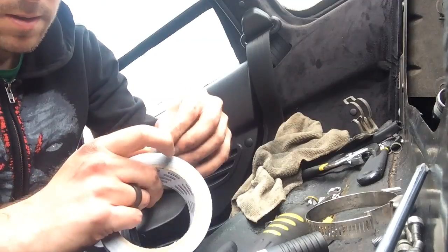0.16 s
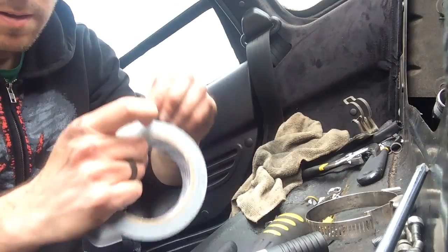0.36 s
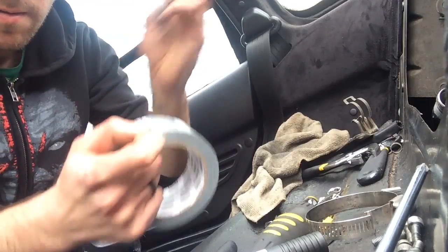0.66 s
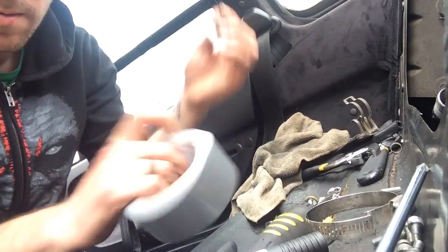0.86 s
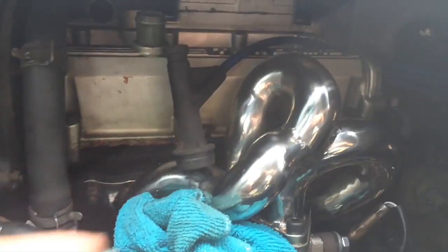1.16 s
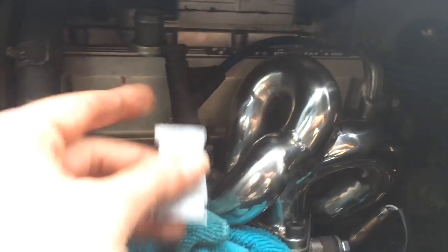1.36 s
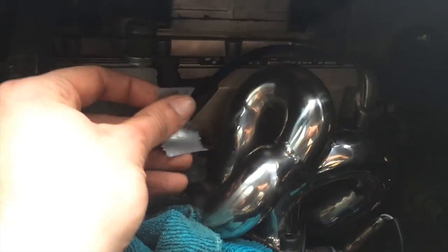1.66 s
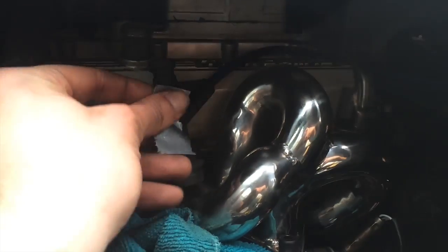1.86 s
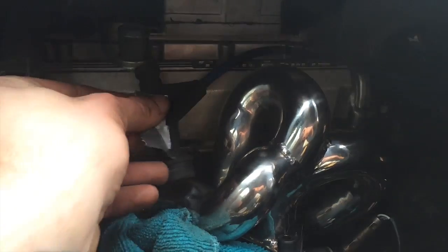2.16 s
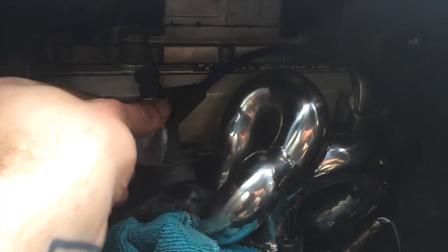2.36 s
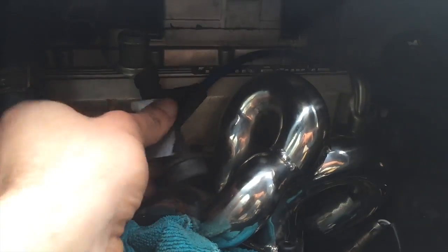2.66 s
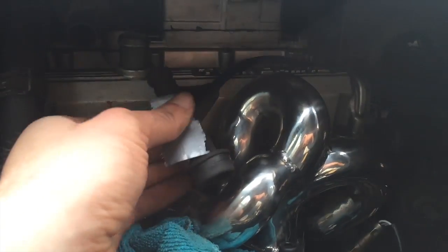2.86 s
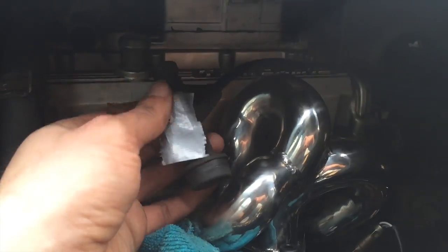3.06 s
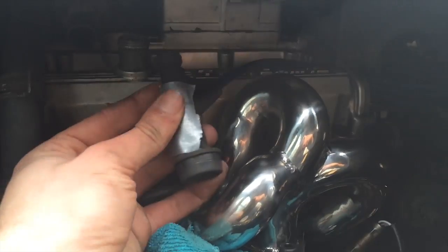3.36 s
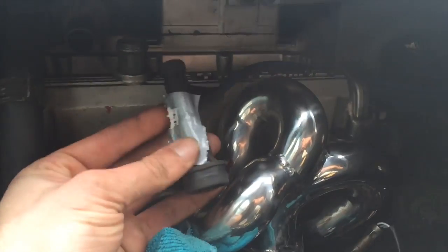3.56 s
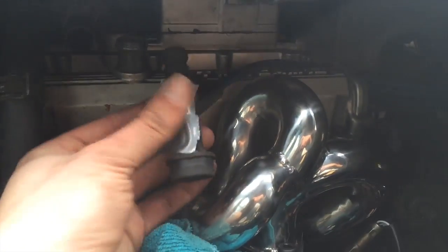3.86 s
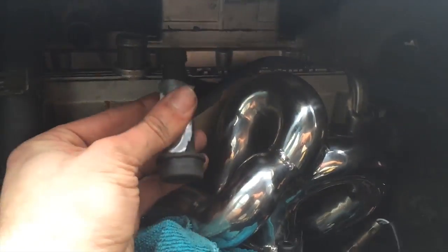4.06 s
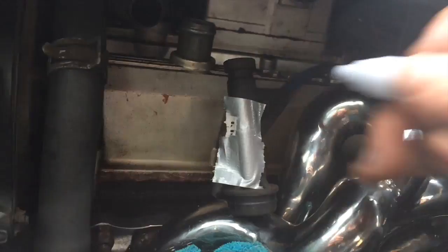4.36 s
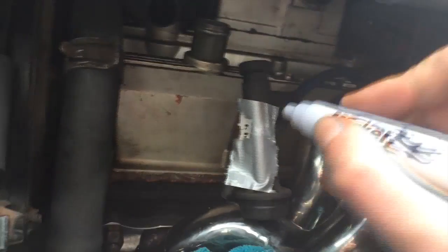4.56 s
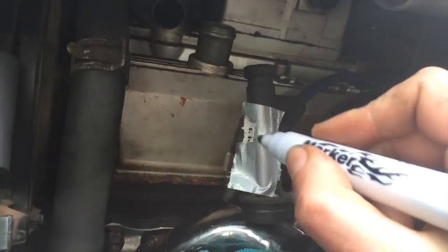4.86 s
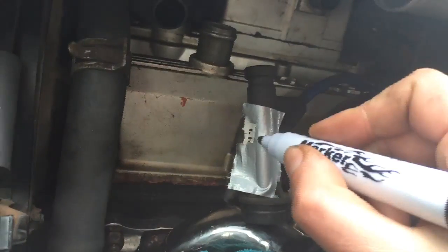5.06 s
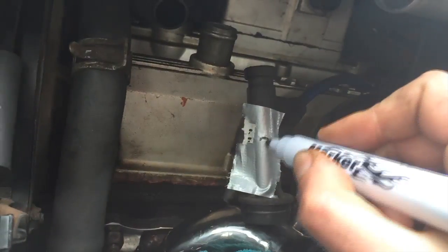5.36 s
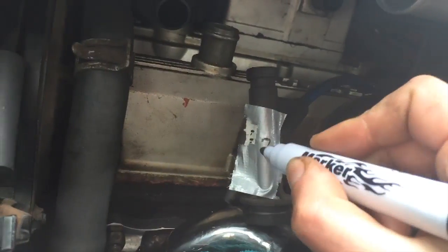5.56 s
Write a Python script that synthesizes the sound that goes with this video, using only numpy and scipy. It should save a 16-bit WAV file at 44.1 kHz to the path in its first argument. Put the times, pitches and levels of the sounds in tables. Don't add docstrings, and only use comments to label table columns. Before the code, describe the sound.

In a vehicle cabin a fingernail ticks at cloth tape, then a strip tears off in a bright, very loud crackling rip. The roll lands with a hollow thud and rattle. An abrupt cut leads to a drier engine bay: small sticky peeling snaps, a soft hose knock, faint skin and cloth rubbing and sparse ticks over low rumble and airy hiss. Close handheld microphone.

```python
import sys
import numpy as np
from scipy import signal
from scipy.fft import rfft, irfft
from scipy.io import wavfile
from scipy.ndimage import uniform_filter1d

SR = 44100
rng = np.random.default_rng(int(sys.argv[2]) if len(sys.argv) > 2 else 0)


def how_loud(loudness_db):
    steps = np.asarray(loudness_db, float) / 20
    return 10 ** steps


def store_pcm(level_fs):
    pcm = np.round(np.clip(level_fs, -1, 1) * 32767).astype(np.int16)
    wavfile.write(sys.argv[1], SR, np.atleast_2d(pcm).T)


N = 252156
CUT_S = 1.159

# [f/Hz, width/Hz]
TAPE_ZONES = [(1820, 1700), (4200, 2330), (7900, 3300), (12500, 3500)]
# [loss per zone away from the brightest/dB, (trim of each zone/dB)]
SNAP_TONES = [
    (7, (-1, 3, -3, 5)),
    (5.5, (-3.5, 1, -3.5, 0.5)),
    (4.6, (-5.5, -1, 2, 3.5)),
    (8.7, (0.82, -1.63, -0.31, 0.73)),
    (5.2, (0.3, -0.91, 0.71, -0.3)),
]
# [t/s, peak level/dB, brightness 0-3, extra body/dB]
RIP_RELEASES = [(0.5759, -32, 0.79, -0.5), (0.5799, -16, 1.8, 0), (0.58, -15, 0.83, -1.5),
                (0.5923, -26.5, 1.5, 4), (0.5976, -15, 1, -0.5), (.599, -13, 1.2, 0), (.601, -10.5, 3, 0),
                (.606, -13.5, 2.9, 0.5), (0.609, -7, 0.83, -0.5), (0.6157, -15.5, 1.2, 4),
                (0.6189, -9, 1, 1.5), (0.6237, -12, 1.4, 0.5), (0.6264, -4.5, 1, -3.5),
                (0.6346, -5, 1, -4.5), (0.6393, -14, 1.5, 4.5), (.6456, -5, 3.5, 4),
                (0.6511, -14.5, 2.3, 6), (0.6555, -6, 2.7, 7), (0.6567, -9, 3, 1), (0.6652, -5, 2.8, 6),
                (0.6753, -6, 2.5, 3), (.682, -8, 2.82, 1), (.6898, -12.5, 3.2, -1),
                (0.6904, -10, 1.9, -0.5), (0.6939, -9.5, 2.5, -2.5), (0.6967, -13.5, 2.7, 2.5),
                (.7013, -19, 2.2, -0.5)]
# [t/s, peak level/dB, brightness 0-3, extra body/dB]
PEEL_RELEASES = [(1.2245, -50, 2.3, 0), (1.2795, -51, 1.8, 0), (1.3441, -48, 1.7, -3),
                 (1.3542, -43.5, 1.6, 0.5), (1.3629, -57, 0.65, -3), (1.3679, -46, 2.1, 0),
                 (1.4012, -36, 1.8, 0), (1.4066, -37, 1.1, 2.5), (1.4104, -29.5, 1.3, 4.5),
                 (1.4126, -25.5, 1.87, 2.5), (1.826, -53, .1, -1), (2.2989, -52, 2.5, 0.5),
                 (2.3264, -42.5, 1.8, 0), (2.3399, -51, 2.6, -5), (2.3587, -36, 1.7, 1),
                 (2.3665, -35.5, 1.5, -5), (2.3711, -31.5, 1.5, -6), (2.3753, -29, 1.7, -1),
                 (2.3781, -24.5, 1.5, -6), (2.3805, -36, 1.6, 6), (2.3837, -26, 1.1, -8),
                 (2.3862, -27.5, 2.8, 8), (2.3924, -28.5, 0.98, 3), (2.3983, -40, .6, 19),
                 (2.3999, -25.5, 1.1, -14), (2.41, -28, 2.5, 5), (2.4135, -34, 1.5, 2),
                 (2.4232, -34, 1.7, 8), (2.4248, -25, 2.14, 6.5)]
# [t/s, peak level/dB, brightness 0-3]
PRESS_RELEASES = [(2.537, -44, 2.2), (2.5464, -52, 2.4), (2.5533, -52, 2), (2.5562, -44, 2.5),
                  (2.558, -43.5, 2.7), (2.5704, -43, 2.5), (2.5781, -46, 1.8), (2.5927, -36, 2.6),
                  (2.6006, -37, 1), (2.604, -34.5, 2.2), (2.6236, -50, 2.4), (2.642, -53, 1.8),
                  (2.6554, -50, 2), (2.6822, -42.5, 3), (2.71, -48, 3), (2.7224, -48, 3), (2.7286, -48, 3),
                  (2.733, -44, 2.6), (2.748, -47, 2.9), (2.7827, -45, 2.8), (2.7854, -38.5, 2.7),
                  (2.79, -38, 2.8), (2.7955, -36, 3), (2.8016, -37, 2.7), (2.8079, -42, 2.4),
                  (2.8111, -28, 2.9), (2.8118, -35, 2.7), (2.816, -31.5, 2.1), (2.8186, -35, 2.5),
                  (2.823, -41, 2.5), (2.8262, -27, 2.3), (2.8293, -20.5, 2.7), (2.8302, -35, 2.7),
                  (2.8553, -42, 2)]


def evened(x):
    return x / np.sqrt(np.mean(x ** 2) + 1e-20)


def read(points, hz):
    f, value = np.transpose(points)
    return np.interp(np.log(hz + 1), np.log(f + 1), value)


def zone(x, hz, width):
    edges = np.clip([hz - width / 2, hz + width / 2], 50, SR / 2 - 500)
    return signal.sosfilt(signal.butter(2, edges, "bandpass", fs=SR, output="sos"), x)


def tone(brightness, fall_db, trim_db):
    distance = abs(np.arange(4)[:, None] - brightness)
    return how_loud(np.array(trim_db)[:, None] - fall_db * np.minimum(distance, 2.3))


def arch(start, top, end, db, rise_db, fall_db, *rest):
    return [(start, db - rise_db, *rest), (top, db, *rest), (end, db - fall_db, *rest)]


def noise(spectrum, patchy_db, size):
    hz = np.fft.rfftfreq(size, 1 / SR)
    a, b, patches = rng.standard_normal((4 * N // size + 5, len(hz), 3)).T
    patches = uniform_filter1d(patches, size=8, axis=0)
    patches = evened(uniform_filter1d(patches, size=10, axis=1))
    z = (a + 1j * b) * how_loud(read(spectrum, hz)[:, None] + patchy_db * patches)
    return evened(signal.istft(z, nperseg=size, noverlap=3 * size // 4)[1][:N])


def room(x, wet_db, gap_s):
    # [f/Hz, t60/s]
    echo_times = [(200, 0.088), (1000, 0.065), (4000, 0.033), (14000, 0.024)]
    t, out = np.arange(N) / SR, x.copy()
    for k in range(3):
        taps = np.zeros(8000)
        at = np.arange(40, 7900, 10) + rng.integers(0, 10, 786)
        taps[at] = rng.choice([-1., 1.], len(at))
        hz, s, z = signal.stft(taps, SR, nperseg=64)
        decay = how_loud(-60 * s / read(echo_times, hz)[:, None])
        tail = signal.istft(z * decay, SR, nperseg=64)[1]
        share = np.sqrt(2 / 3) * np.cos(2 * np.pi * (t / gap_s + k / 3))
        out += signal.oaconvolve(how_loud(wet_db) * x * share, tail / np.linalg.norm(tail))[:N]
    return out


def snaps(rows, colour):
    scatter_s, scatter_db, softness = .001, -21.0, 0.33
    count, trains = 256, np.zeros((4, N + 256))
    t = np.arange(count) / SR
    s, db, brightness, *body_db = np.transpose(rows)
    levels = how_loud(db) * tone(brightness, *colour)
    levels[0] *= how_loud(sum(body_db))
    faint_db = np.clip(-30.5 - db, 0, 18)[:, None]
    fibres = rng.standard_normal((len(rows), count)) * np.exp(-t / scatter_s)
    fibres *= how_loud(scatter_db + softness * faint_db)
    fibres[:, 0] = 1
    fibres /= how_loud(softness * faint_db / 2)
    for at, gains, burst in zip(s, levels.T, fibres):
        trains[:, round(at * SR) - 4:][:, :count] += np.outer(gains, burst)
    rung = [zone(train[:N], hz, width) * SR / (2 * width) for train, (hz, width) in zip(trains, TAPE_ZONES)]
    return how_loud(-0.5) * sum(rung)


def crackle(strokes, colour, per_s, spread_db, smooth):
    size = how_loud(spread_db * np.minimum(rng.exponential(1, N), 1.6))
    size *= rng.random(N) < per_s / SR
    drive = evened(size * rng.standard_normal(N)) + smooth * rng.standard_normal(N)
    t, out = np.arange(N) / SR, np.zeros(N)
    zones = np.array([evened(zone(drive, hz, width)) for hz, width in TAPE_ZONES])
    for rows in strokes:
        s, db, brightness = np.transpose(rows)
        on = slice(round(s[0] * SR), round(s[-1] * SR))
        level = signal.windows.tukey(len(t[on]), .08) * how_loud(np.interp(t[on], s, db))
        gains = tone(np.interp(t[on], s, brightness), *colour)
        out[on] += level * (gains * zones[:, on]).sum(0)
    return out


def knock(blows, modes, spread=0.038):
    t, out = np.arange(9000) / SR, np.zeros(N)
    for s, db, contact in blows:
        detune = 1 + spread * rng.uniform(-1, 1, len(modes))
        ring = np.zeros(len(t))
        for k, (hz, d, t60) in enumerate(modes):
            ring += (-1) ** k * how_loud(d - 60 * t / t60) * np.sin(2 * np.pi * hz * detune[k] * t)
        push = np.exp(-t[:400] / contact) * t[:400]
        at = max(round(s * SR), 0)
        out[at:at + len(t)] -= how_loud(db) * np.convolve(ring, push / push.sum())[:len(t)]
    return out


def rattle(event, colour):
    s, db, rise, t60 = event
    t, hz = np.arange(4096) / SR, np.fft.rfftfreq(4096, 1 / SR)
    burst = evened(irfft(rfft(rng.standard_normal(4096)) * how_loud(read(colour, hz))))
    out = np.zeros(N)
    out[round(s * SR):][:4096] = burst * how_loud(db - 60 * t / t60) * np.minimum(t / rise, 1) ** 2
    return out


def background():
    # [f/Hz, level/dB per Hz]
    rumble_colour = [(11, -54.5), (25, -25.5), (48, -16.5), (65, -7), (84, 5), (100, -3.5), (119, -17),
                     (180, -39.5), (300, -120)]
    drone_colour = [(74, -31.5), (125, 0), (165, 1), (218, -7.5), (253, -18.5), (330, -17), (430, -48.5),
                    (730, -120)]
    air_colour = [(150, -32), (250, -7.5), (373, -9), (468, -0.5), (538, -7), (2360, -18), (2620, -19),
                  (4340, -24.5), (14700, -33.5), (16000, -48.5)]
    # [t/s, level/dB]
    slow_level = [(.06, 0.5), (.534, -1), (.748, -7), (.954, -4.5), (1.1, -0.5), (1.17, 1), (1.46, 0),
                  (1.89, -0.5), (2.33, 0), (2.61, 0.75), (3.46, -2), (3.87, 0), (4.06, -1.5), (4.3, 0.4),
                  (4.61, 0.2), (5.07, -1), (5.72, -3)]
    # [cabin level/dB, bay level/dB, share of the slow level followed]
    layers = [
        (-44, -51.5, 1.1),
        (-56.5, -57, 1.5),
        (-65.5, -64, 1.189),
    ]
    # [t/s, extra level/dB, half length/s]
    rumble_swells = [(1.53, 4.5, 0.12), (2.341, 11.5, 0.022), (2.769, 11, 0.062), (3.219, 10.5, 0.062),
                     (3.529, 10.5, 0.021), (4.115, 10.5, 0.073), (4.821, 11, 0.038)]
    # [t/s, extra level/dB, half length/s]
    drone_swell = (9.5, 4.6, 0.18)
    t = np.arange(N) / SR
    slow_db = np.interp(t, *np.transpose(slow_level))
    rumble_db, drone_db, air_db = (np.where(t < CUT_S, cabin, bay) + share * slow_db
                                   for cabin, bay, share in layers)
    for at, db, half in rumble_swells:
        rumble_db = rumble_db + db * np.exp(-((t - at) / half) ** 2)
    at, db, half = drone_swell
    drone_db = drone_db + db * np.exp(-((t - at) / half) ** 2)
    rumble = how_loud(rumble_db) * noise(rumble_colour, 0.98, size=4096)
    drone = how_loud(drone_db) * noise(drone_colour, 1.3, size=4096)
    return rumble + drone + how_loud(air_db) * noise(air_colour, 1.2, size=512)


def loose_tools():
    # [t/s, level/dB, rise/s, t60/s]
    jolt, clatter = [
        (.0001, -35.5, 0.00019, 0.044),
        (1.1108, -13, 0.002, 0.063),
    ]
    # [f/Hz, level/dB per Hz]
    jolt_colour = [(180, -36), (300, -19), (468, -18.5), (1120, -20), (1780, -33), (13100, -41.5),
                   (15500, -35.5)]
    clatter_colour = [(650, -4), (1100, -6), (1640, -12), (2520, -13.5), (4590, -22), (5240, -26.5),
                      (7550, -23.5), (15500, -51.5)]
    return rattle(jolt, jolt_colour) + rattle(clatter, clatter_colour)


def door_panel():
    # [t/s, level/dB, contact/s]
    blows = [(.001, -33, 0.00022)]
    # [f/Hz, level/dB, t60/s]
    modes = [(222, 0, .14), (305, -7.5, 0.095)]
    return knock(blows, modes)


def seat_bumps():
    # [t/s, level/dB, contact/s]
    blows = [
        (.002, -12.5, 0.0005),
        (1.112, -24.5, 0.00058),
        (1.1295, -15, 0.00077),
    ]
    # [f/Hz, level/dB, t60/s]
    modes = [(98.6, 2, 0.14), (124, -4, 0.042), (159.3, -10.5, 0.2), (222, -24.5, 0.021)]
    return knock(blows, modes, 0.025)


def nail_picks():
    # [t/s, peak level/dB, brightness 0-3 = the zone that rings most]
    picks = [(.048, -50, 1.2), (.1673, -58, 1.1), (.192, -46.5, 1), (0.2577, -38, 1.8), (0.2657, -34, 2),
             (.3048, -54, 1.8), (0.322, -54, 1), (.3338, -47, 1.6), (.3566, -48.5, 1.4),
             (0.3702, -51, 0.57), (0.377, -52, 1.7), (.419, -54, 0.9), (0.432, -32.5, 1.75),
             (0.5452, -44, 0.092), (0.5546, -35.5, 0.29), (.558, -33, 0.53), (0.9654, -45.5, 2.1)]
    return snaps(picks, SNAP_TONES[0])


def rubbing():
    # [start/s, strongest/s, end/s, level/dB, brightness 0-3]
    strokes = [(0.161, 0.194, 0.2, -64.5, 1.2), (0.257, 0.265, 0.28, -51, 1.1), (.3, 0.314, 0.37, -75, 2.1),
               (0.35, 0.375, 0.383, -58.5, 1.7), (0.435, 0.433, 0.44, -52, 1.6),
               (0.904, 0.968, 0.96, -66.5, 2.1), (1.026, 1.038, 1.13, -67, 2.4),
               (1.144, 1.161, 1.164, -61.5, 0.089), (1.177, 1.398, 1.43, -61, 2),
               (2.28, 2.347, 2.5, -64, 1.9), (2.44, 2.465, 2.6, -79, 1.8), (2.503, 2.604, 2.68, -63.5, 1.8),
               (2.675, 2.726, 2.84, -73, 2.4), (3.057, 3.088, 3.14, -66, 2.1),
               (3.192, 3.215, 3.33, -64.5, 2.4), (3.499, 3.608, 3.685, -60.5, 2.2),
               (3.86, 3.87, 3.93, -68.5, 2.6), (3.975, 3.999, 4.15, -72, 2.5),
               (4.476, 4.546, 4.4, -67, 1.3), (4.33, 4.58, 4.95, -70.5, 0.17)]
    # [t/s, level/dB, brightness 0-3]
    sleeve = [(4.186, -69.5, 0.73), (4.197, -69, 0.72), (4.26, -63.5, 1), (4.31, -68, 0.67),
              (4.335, -78, 0.44)]
    # [loss per zone/dB, (trim of each zone/dB)]
    colour = (3.9, (6, 2, 0, 3.5))
    curves = [arch(*row[:4], 16, 15.5, row[4]) for row in strokes]
    return how_loud(-3.0) * crackle(curves + [sleeve], colour, 1500, 4.5, 1.4)


def rip_snaps():
    return snaps(RIP_RELEASES, SNAP_TONES[1])


def slump(db_per_s, most_db):
    t = np.arange(N) / SR
    times = np.sort([row[0] for row in RIP_RELEASES + PEEL_RELEASES + PRESS_RELEASES])
    since = t - times[np.maximum(np.searchsorted(times, t) - 1, 0)]
    return how_loud(-np.clip(db_per_s * since, 0, most_db))


def pull_crackle():
    # [t/s, crackle level/dB, brightness 0-3]
    pulls = [
        [(.579, -25.5, 1.5), (.594, -39, 1.7), (.599, -36.5, 0.74), (.629, -19, 7.5), (.652, -26.5, 2.2),
         (.658, -21.5, 1.4), (.695, -22, 2.4), (.705, -42.5, 2.6), (.726, -41.5, 2.1)],
        [(2.357, -53, 1.9), (2.373, -61, 1.8), (2.379, -45.5, 1.5), (2.4, -46, 0.63), (2.43, -47, 1),
         (2.45, -55, 0.57)],
        [(2.78, -65, 3.1), (2.798, -70, 3.3), (2.811, -44.5, 4.4), (2.829, -46.5, 2.8), (2.836, -51, 3.8),
         (2.855, -57, 1.8)],
    ]
    # [loss per zone/dB, (trim of each zone/dB)]
    colour = (2.6, (-1, -2, 4, 3.5))
    return slump(900, 13) * crackle(pulls, colour, 3000, 3.6, 0.44)


def moving_peak(x):
    # [t/s, f/Hz, width/Hz, level/dB]
    paths = [
        [(.605, 1020, 500, -9), (.632, 1850, 517.8, 2), (.665, 1952, 650, 0), (.705, 2284, 501, -1)],
        [(2.5, 10400, 2000, -3.5), (2.8, 9960, 2000, 8)],
        [(4.18, 2930, 1500, -2), (4.34, 2747, 1500, 1)],
    ]
    out = x.copy()
    for rows in paths:
        s, hz, width, db = np.transpose(rows)
        on = slice(round(s[0] * SR), round(s[-1] * SR))
        t = np.arange(N)[on] / SR
        turn = np.exp(2j * np.pi * np.cumsum(np.interp(t, s, hz)) / SR)
        r = np.exp(-np.pi * 1.5 * width.mean() / SR)
        smoothed = signal.lfilter([(1 - r) ** 2], [1, -2 * r, r * r], x[on] / turn)
        out[on] += how_loud(np.interp(t, s, db)) * 2 * (turn * smoothed).real
    return out


def strip_twang():
    # [t/s, level/dB, contact/s]
    releases = [(.6094, -19.5, .00004), (.6355, -25.5, .00004)]
    # [f/Hz, level/dB, t60/s]
    modes = [(1020, 0, 0.022), (1304, -4, .02)]
    return knock(releases, modes)


def drumming():
    # [start/s, strongest/s, end/s, level/dB]
    swells = [
        (0.616, .69, .72, -41),
        (1.723, 1.847, 1.89, -54.5),
    ]
    t = np.arange(N) / SR
    tugs = rng.standard_normal(N) * (rng.random(N) < 600 / SR)
    level = np.zeros(N)
    for row in swells:
        curve = arch(*row, 9.5, 26)
        level += how_loud(np.interp(t, *np.transpose(curve), -120, -120))
    return how_loud(-7.5) * level * evened(zone(tugs, hz=520, width=650))


def roll_jerks():
    # [t/s, level/dB, contact/s]
    jerks = [(.6352, -25, .0001), (.6455, -31.5, 0.00017), (.656, -31, 0.00018), (.6648, -36, .0002),
             (.6747, -17, .00012), (.6905, -31.5, 0.00036)]
    # [f/Hz, level/dB, t60/s]
    modes = [(520, 1.5, 0.00702), (200, -10.5, .015)]
    return knock(jerks, modes)


def roll_thuds():
    # [t/s, level/dB, contact/s]
    blows = [
        (1.088, -51.5, .0001),
        (1.096, -42, 0.00013),
        (1.1035, -32.5, 0.000078),
        (1.1095, -8, 0.000099),
        (1.1205, -29, 0.00012),
        (1.1272, -16.5, 0.0001),
    ]
    # [f/Hz, level/dB, t60/s]
    modes = [(411, 3, 0.044), (507.6, 1, 0.037), (355, -10, 0.05), (249.2, -17.5, 0.041),
             (660, -12.5, 0.04), (911, -10.5, 0.037), (1124, -19, .05), (1600, -18.5, 0.078),
             (1300, -20.5, .04)]
    return knock(blows, modes, 0.01685)


def peel_snaps():
    return snaps(PEEL_RELEASES, SNAP_TONES[2])


def corner_pop():
    # [t/s, level/dB, contact/s]
    pop = [(2.4236, -34, .00006)]
    # [f/Hz, level/dB, t60/s]
    modes = [(1220, 4, 0.017), (1725, 0, 0.016)]
    return knock(pop, modes)


def press_snaps():
    return snaps(PRESS_RELEASES, SNAP_TONES[3])


def metal_clasp():
    # [t/s, level/dB, contact/s]
    flicks = [(2.642, -53, .00001), (2.8549, -52, .00001)]
    # [f/Hz, level/dB, t60/s]
    modes = [(6450, 0.0057, 0.022)]
    return knock(flicks, modes)


def hose_knocks():
    # [t/s, level/dB, contact/s]
    blows = [
        (2.851, -36.5, 0.00087),
        (2.8678, -39.5, 0.000057),
        (2.882, -52, 0.00021),
    ]
    # [f/Hz, level/dB, t60/s]
    modes = [(225, 3, 0.11), (320, 6.5, 0.038), (530, 3.5, 0.063), (723, 11, 0.014), (1040, -9, 0.036)]
    return knock(blows, modes)


def late_ticks():
    # [t/s, peak level/dB, brightness 0-3]
    ticks = [(3.089, -53, 2.7), (3.2213, -55, 3.9), (3.5652, -44.5, 1.7), (3.6024, -52, 3.5),
             (3.6097, -39, 2.9), (3.789, -61, 2.8), (3.874, -54, 2.7), (4.008, -60, 3.06),
             (4.067, -57.5, 2.6), (4.1133, -62, 2.9), (4.1236, -41.5, 2.4), (4.684, -63.5, 0.44)]
    return snaps(ticks, SNAP_TONES[4])


def pen_cap():
    # [t/s, level/dB, contact/s]
    touch = [(4.1234, -52.5, .00001)]
    # [f/Hz, level/dB, t60/s]
    modes = [(7280, -3.5, 0.037), (9280, -1, .04), (5620, -9, .02)]
    return knock(touch, modes)


def scene():
    before = np.clip((CUT_S * SR - np.arange(N)) / 24, 0, 1)
    tape = nail_picks() + rubbing() + rip_snaps() + pull_crackle()
    tape += peel_snaps() + press_snaps() + late_ticks()
    wet_db = np.where(before > 0, -5, -7)
    tape = room(moving_peak(tape) + drumming(), wet_db, .07)
    tape[round(.7255 * SR):round(.8 * SR)] *= how_loud(-8)

    cabin = room(roll_thuds() + loose_tools(), -10.5, .11) + seat_bumps()
    cabin = signal.sosfilt(signal.butter(2, 54, "highpass", fs=SR, output="sos"), cabin * before)
    hose = room(hose_knocks(), -11.0, 0.095)
    small = door_panel() + strip_twang() + roll_jerks() + corner_pop() + metal_clasp() + pen_cap()
    return (background() + tape + cabin + hose + small)[None]


def top_cut(x):
    return signal.sosfilt(signal.butter(12, 16330, fs=SR, output="sos"), x)


def record(dry):
    ceiling = .8
    rounded = ceiling * np.tanh(dry / ceiling)
    dull = signal.oaconvolve(rounded, signal.firwin(63, 15400, fs=SR)[None], "same")
    return top_cut(dull)


dry = scene()
out = record(dry)
store_pcm(out)
```